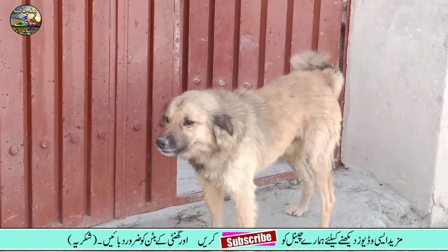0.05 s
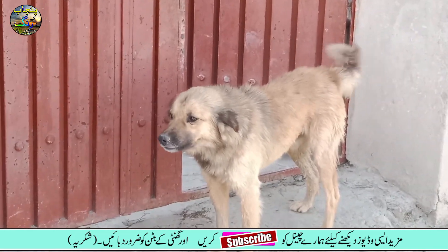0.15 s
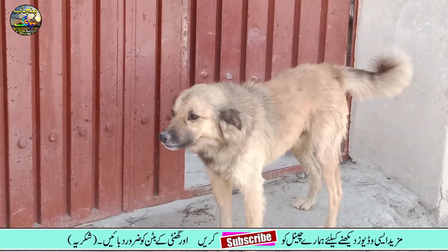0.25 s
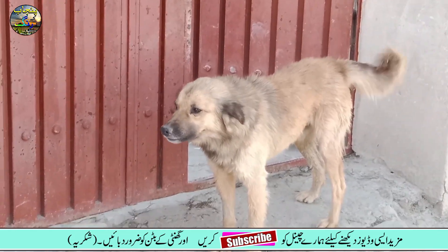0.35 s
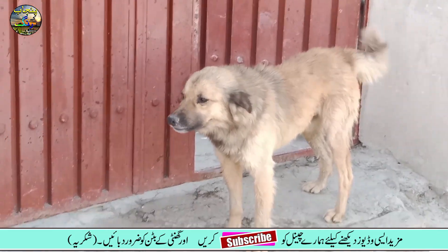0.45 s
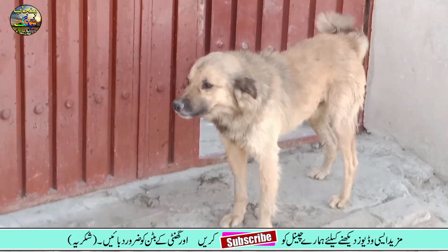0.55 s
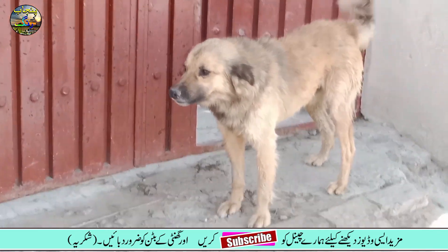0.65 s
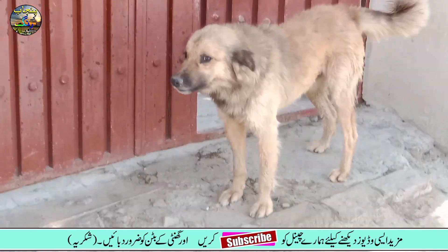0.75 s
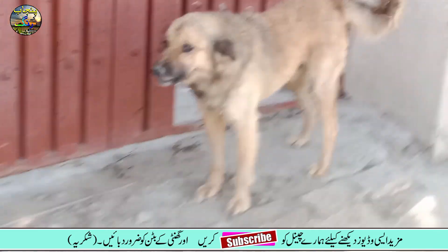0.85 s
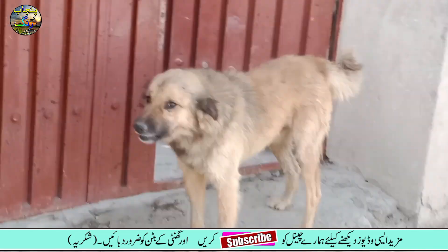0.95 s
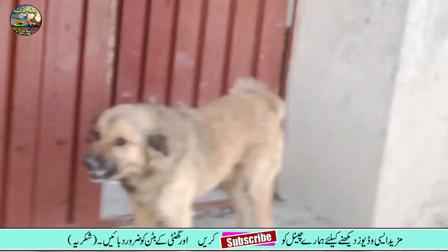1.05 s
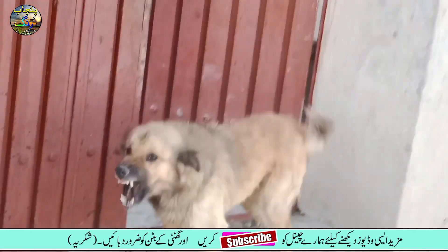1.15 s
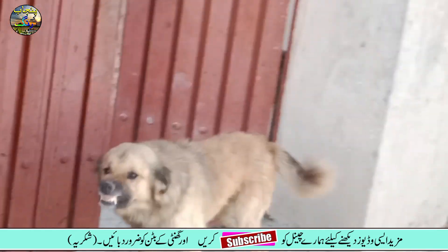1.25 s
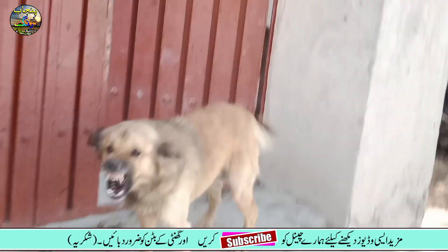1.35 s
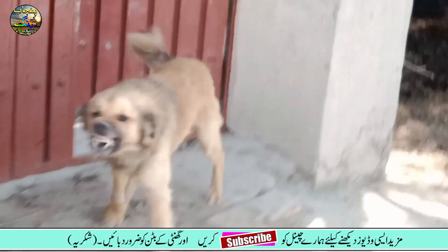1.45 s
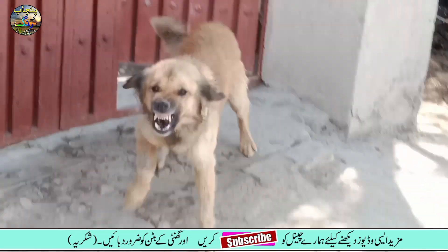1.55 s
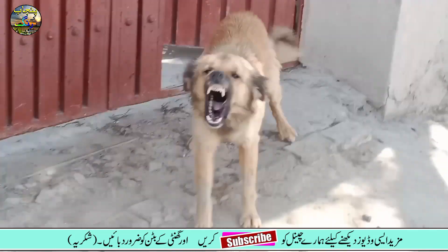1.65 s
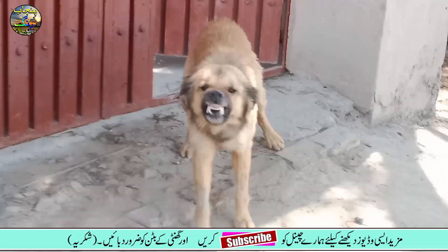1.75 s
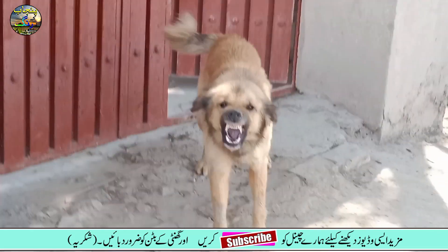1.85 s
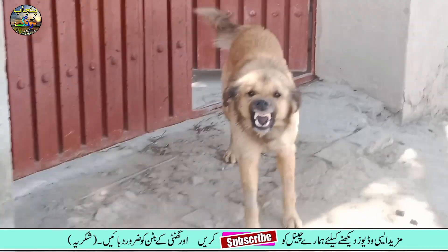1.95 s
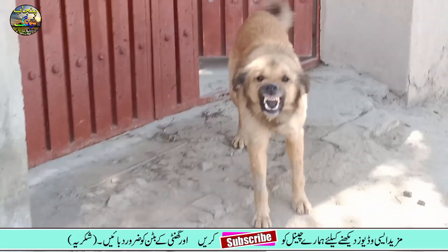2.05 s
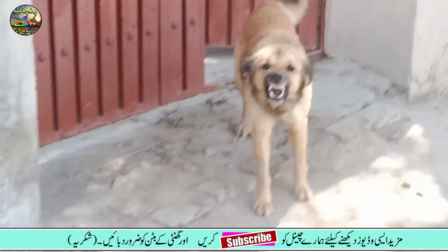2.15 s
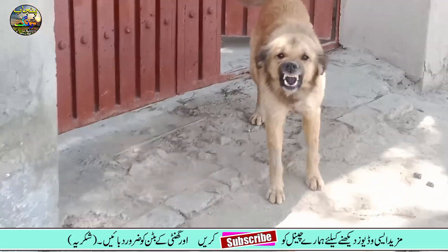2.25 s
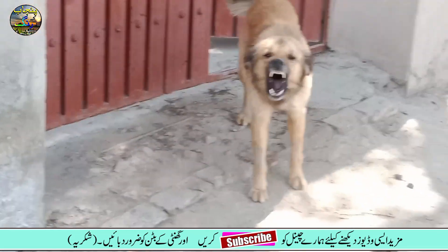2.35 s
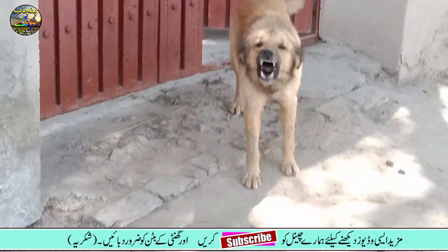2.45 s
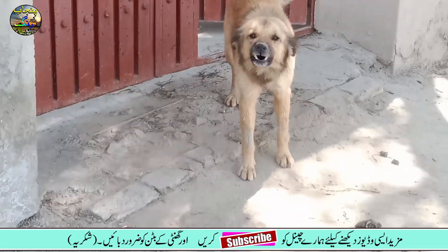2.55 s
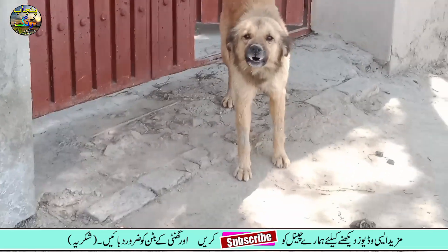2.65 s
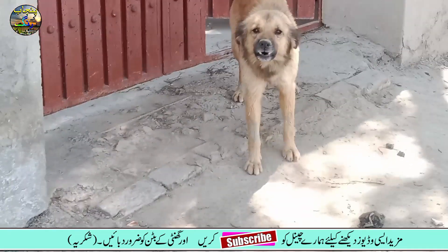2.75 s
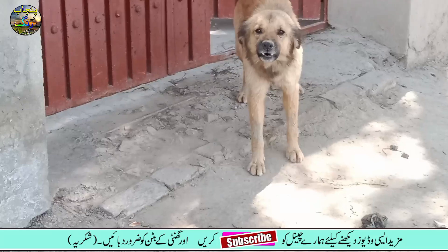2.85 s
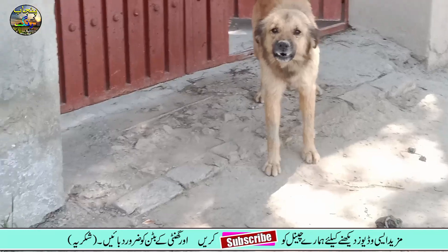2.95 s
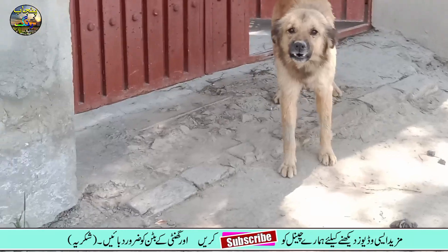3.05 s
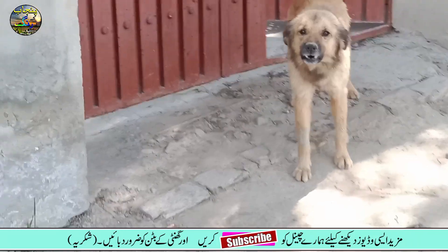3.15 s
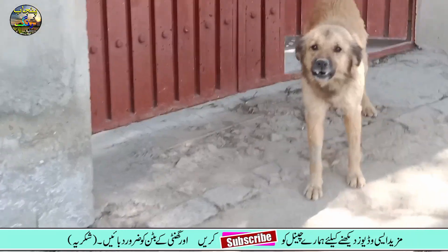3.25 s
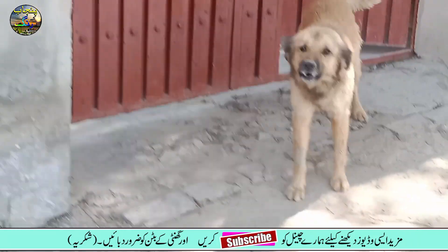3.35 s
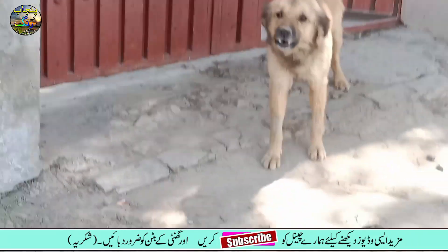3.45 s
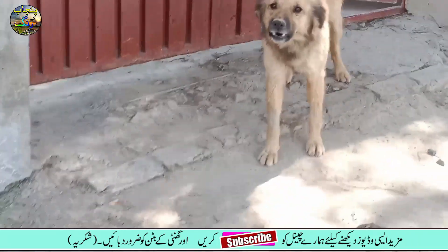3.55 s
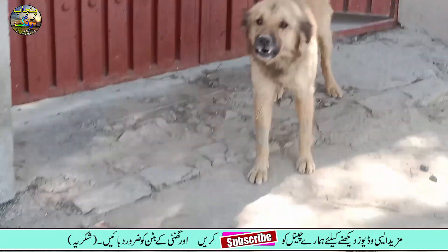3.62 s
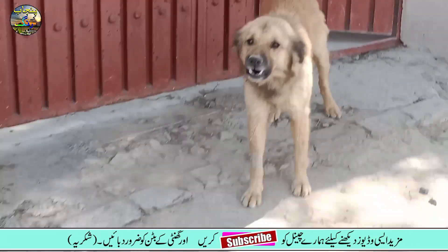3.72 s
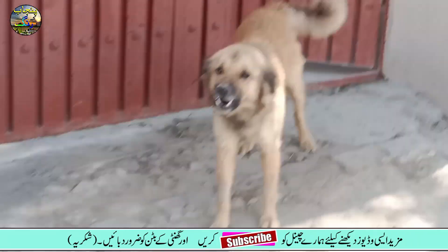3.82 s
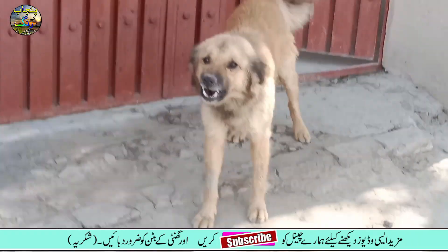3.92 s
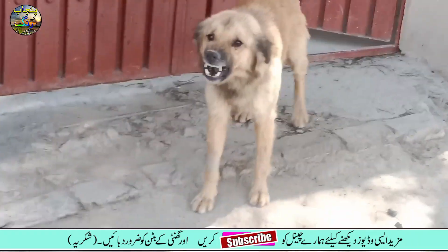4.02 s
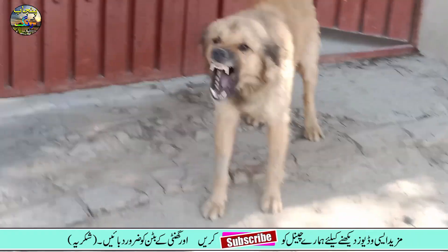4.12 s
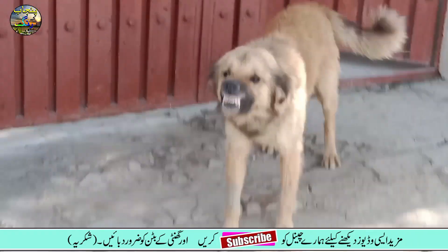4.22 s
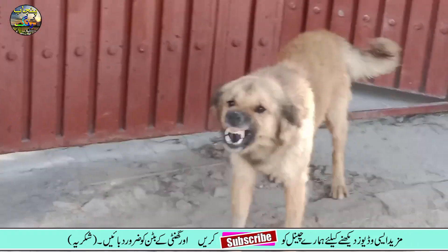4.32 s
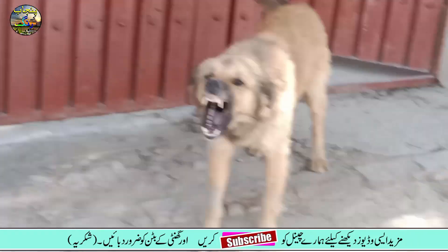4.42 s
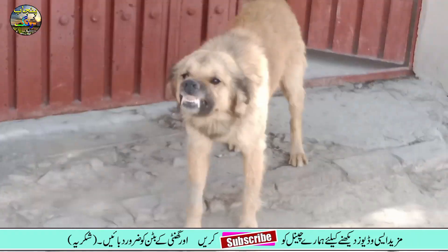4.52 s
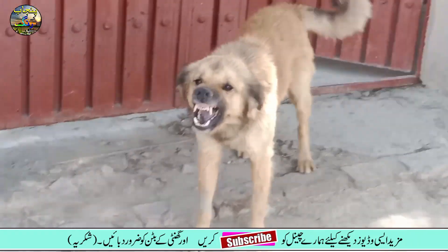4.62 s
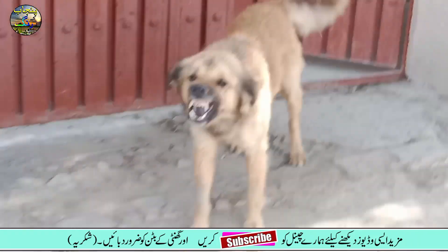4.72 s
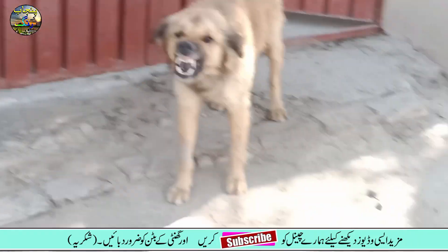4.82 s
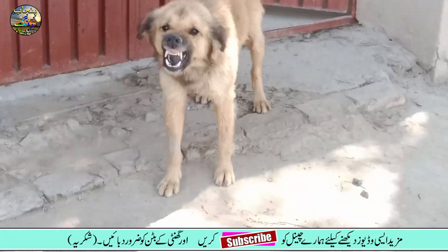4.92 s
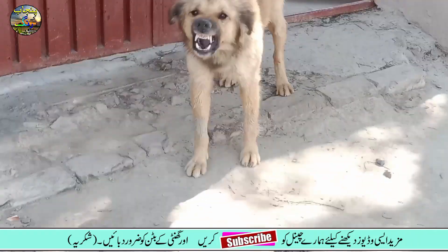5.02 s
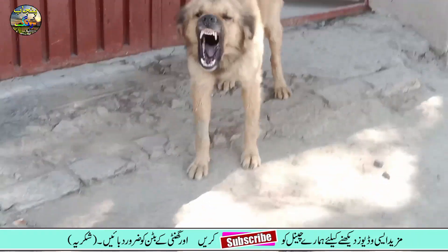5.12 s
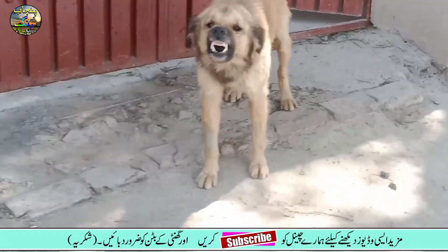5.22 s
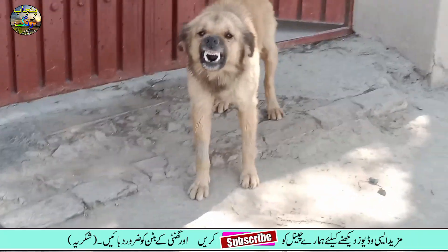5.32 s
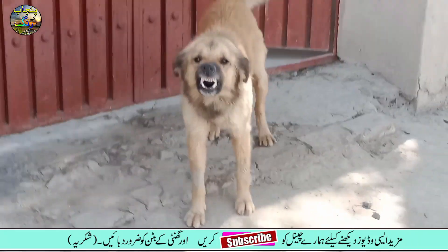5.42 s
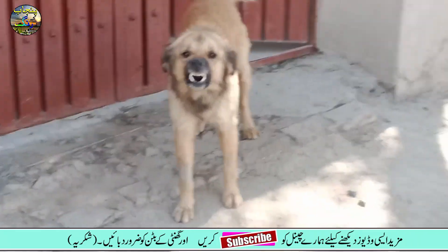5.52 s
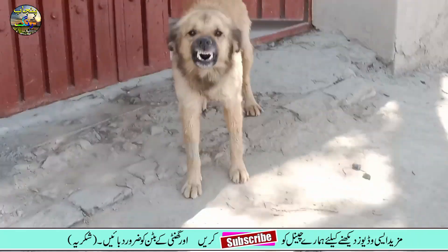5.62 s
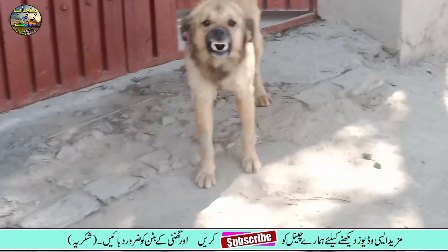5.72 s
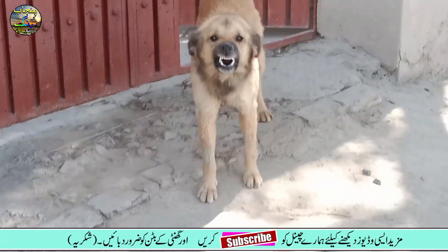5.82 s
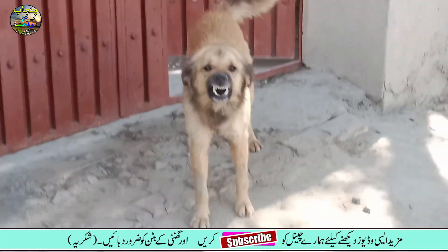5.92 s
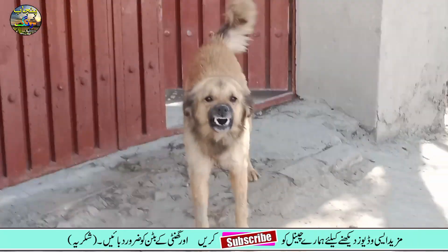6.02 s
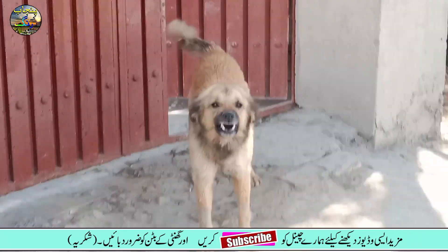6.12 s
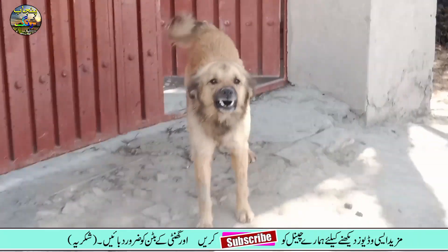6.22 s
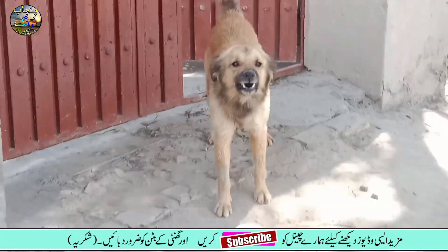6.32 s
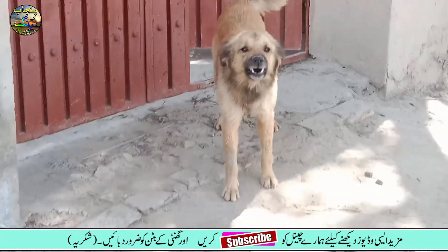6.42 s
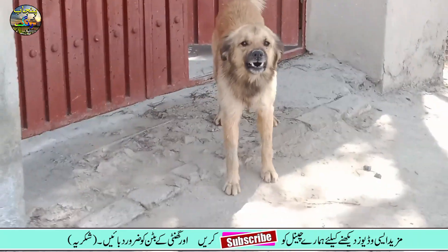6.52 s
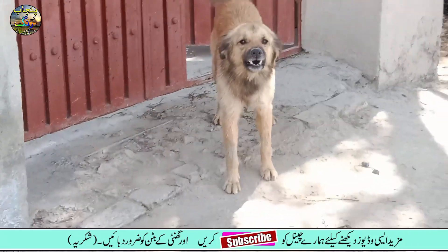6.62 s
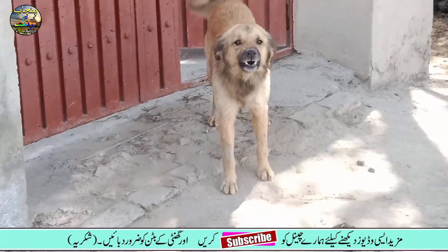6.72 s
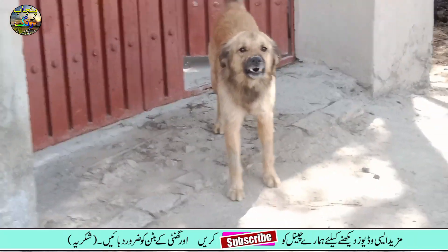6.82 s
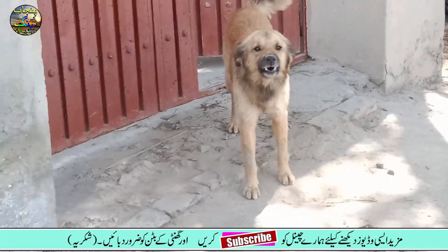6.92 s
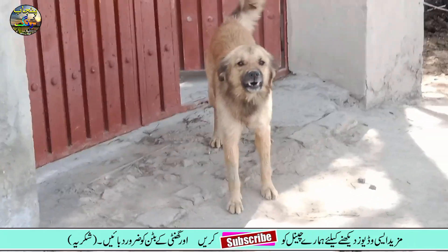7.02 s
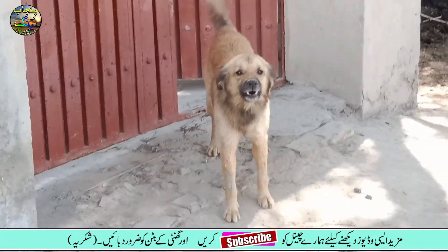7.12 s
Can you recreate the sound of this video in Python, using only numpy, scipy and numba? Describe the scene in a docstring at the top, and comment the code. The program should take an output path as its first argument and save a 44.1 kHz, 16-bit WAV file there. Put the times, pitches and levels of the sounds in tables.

```python
"""A large dog in a yard between a steel gate and a concrete wall, close to a phone: a faint growl opens, then
three barks, a snarl, a bark, a long growl, two barks, a snarl, a last bark and a growl that dies down.
Each bark is a pitched tone mixed with chopped noise: it shoots up as a hoarse roar, clears, and sinks back.
Growls are slow pulses ringing the throat and mouth; snarls are rattling air dragged in through bared teeth.
Between them grit crunches underfoot as shaped noise, and echoes follow every sound over a faint air noise."""
import sys
import numpy as np
from scipy import signal
from scipy.fft import rfft, irfft
from scipy.io import wavfile
from scipy.ndimage import uniform_filter1d
from numba import njit

SR = 44100
rng = np.random.default_rng(int(sys.argv[2]) if len(sys.argv) > 2 else 0)


def store_pcm(level_fs):
    """Save levels as 16-bit WAV."""
    pcm = np.round(np.clip(level_fs, -1, 1) * 32767).astype(np.int16)
    wavfile.write(sys.argv[1], SR, np.atleast_2d(pcm).T)


N = 316197
T = np.arange(N) / SR


def bark():
    """Hard-driven vocal folds swing between chaos and a clean tone, heard through the wide open mouth."""
    # low part of the voice: (frequency [Hz], relative strength [dB])
    body_points = [(80, -44), (160, -24), (250, -14), (330, -24), (450, -10.5), (560, 4.5), (640, 6),
                   (760, -1.5), (900, -23), (1300, -45.5)]
    # hoarse upper part of the voice: (frequency [Hz], relative strength [dB])
    rasp_points = [(1500, -25), (2300, 8.5), (2750, 2), (3300, -8), (3900, -4.5), (4700, -6), (5600, -2.5),
                   (6600, -10.5), (8000, -11), (9300, -30.5), (12000, -25.5), (15000, -38)]
    db, hz, rough, second_hz, second_db, third_hz, third_db, rasp_db = voice_controls()
    rough = np.clip(rough, 0, 1)
    shaky_hz = hz * (1 + 0.0906 * rough * wander(220))
    phase = 2 * np.pi * np.cumsum(shaky_hz) / SR
    tone = unit(sum(np.sin(k * phase) / k ** 1.4 for k in np.arange(1, 5)))
    # roughness weakens the tone and makes it flutter
    tone = (1 - rough) * tone * (1 + 1.15 * rough * wander(170))

    # the lips and false folds flap unevenly and chop the airflow
    _, puffs = flaps(np.full(N, 150.), jitter=0.47, scatter_db=2.5, open_share=0.58)
    chaos = unit((puffs + 0.91) * noise())
    source = tone + (1.7 * rough ** 0.98 + 0.019) * chaos

    # the lowest resonance climbs with the pitch as the jaw drops
    lowest = formant(source, np.clip(hz, 480, 670), width_hz=120)
    body = colour(source + 0.55 * tone, body_points) + 0.41 * lowest
    second = formant(source, second_hz, width_hz=305)
    third = formant(source, third_hz, width_hz=400)
    third = third + 0.24 * formant(source, 1.243 * third_hz, width_hz=700)
    rasp = upper_throat(source + 0.1 * chaos, second_hz / 2, restless=0.024)
    rasp = upper_throat(rasp, third_hz / 2, restless=0.084)
    rasp = colour(rasp, rasp_points)

    # as the jaw closes, side pockets of the throat swallow the band near 4 kHz;
    # a lower level stands for a more closed jaw
    closed = np.interp(db, [-23, -14], [1, .1])
    for pocket_hz in (3700., 3950., 4250., 4600.):
        rasp = rasp - closed * svf(rasp, np.full(N, pocket_hz), 1200.0)

    parts = [(body, .2), (second, second_db - .3), (third, third_db + 0.42), (rasp, rasp_db + 0.15)]
    voice = sum(even(x, window_s=0.021) * undb(db + share_db) for x, share_db in parts)
    # the wide open mouth radiates almost nothing below 50 Hz
    return signal.sosfilt(signal.butter(2, 50, "high", fs=SR, output="sos"), voice)


def voice_controls():
    """One throat makes all barks and grunts: the strongest push of the moment takes it over."""
    # barks: (start of hold [s], attack [s], hold [s], fall [s], top pitch [Hz], base level [dB],
    # swell over the hold [dB], share of the hold before it clears [0-1], roughness once cleared [0-1],
    # second resonance [Hz], its base share [dB], third resonance [Hz], its base share [dB],
    # base share of the rasp [dB])
    bark_rows = [(1.243, .048, 0.088, 0.046, 692.5, -12.5, 0, 0.82, .5, 910, -3, 1666, -10, -19),
                 (1.469, .048, 0.092, 0.03, 659.3, -10.5, 0, .66, 0.15, 1082, -5, 1650, -11.5, -19.5),
                 (1.735, 0.051, 0.079, .042, 641, -12.5, 2.5, 0.74, 0.08, 1078, -4, 1740, -10, -19.5),
                 (2.42, .034, .086, .016, 654, -12.5, 3.5, 0.66, 0.1, 1053, -5.5, 1845, -11.5, -17.5),
                 (4.185, .058, .108, .036, 680.4, -12, 3, .42, 0.35, 1039, -8.5, 1519, -6, -19),
                 (4.489, .052, 0.099, 0.025, 648.4, -11, -0.5, 0.5, 0.12, 1086, -5, 1605, -9.5, -20),
                 (5.146, 0.035, .088, .017, 656.3, -12.5, 3.5, 0.67, 0.26, 989, -9.5, 1540, -8.5, -18.5)]
    # grunts, weak last pushes between and after barks: (middle [s], length [s], pitch at the middle [Hz],
    # level at the middle [dB], share of the upper resonances [dB])
    grunt_rows = [(1.405, .05, 266.1, -34.5, 0), (1.613, 0.053, 286.9, -26.5, -5),
                  (1.703, .055, 214.9, -23, -7.5), (2.566, 0.0454, 269.2, -30, 0.5),
                  (2.642, .058, 210, -33, -1.5), (4.63, .035, 311, -34, -4), (5.274, .065, 312, -26, -2),
                  (5.362, 0.12, 207.5, -34, -2)]
    # a curve point every 32 samples is enough
    t = T[::32]
    pushes = [bark_course(t, *row) for row in bark_rows]
    pushes += [grunt_course(t, *row) for row in grunt_rows]
    pushes = np.array([np.broadcast_arrays(*push) for push in pushes])
    levels = pushes[:, :1]
    # the fourth power lets the strongest push win clearly
    lead = undb(levels - levels.max(axis=0)) ** 4
    blended = (lead * pushes).sum(axis=0) / lead.sum(axis=0)
    return [np.interp(T, t, curve) for curve in blended]


# roughness of a bark's tail and of the grunts (0 = clean, 1 = chaos)
TAIL_ROUGH = 0.434


def bark_course(t, start, attack_s, hold_s, fall_s, top_hz, db, swell_db, clears, clear_rough,
                second_hz, second_db, third_hz, third_db, rasp_db):
    """One bark: level, pitch, roughness, the two upper resonances with their shares, and the rasp."""
    # pitch leaps from a low note and arches over the hold
    low_hz, leap_s, arch, crest_share = 225.4, 0.014, .38, .69
    # it starts as a roar and clears part way through the hold
    roar_rough, clearing_share = 0.866, 0.13
    # the level climbs through the attack, drops when the push ends and then fades
    attack_db, drop_db, drop_share, fade_db_per_s = 40, 20, 0.74, 153
    # pitch and level let go gently at first, then quickly (exponent of the fall)
    fall_roundness = 1.4
    # the jaw gapes mid-bark, moving power from the lowest resonance to the parts above
    gape_dip_db, gape_second_db, gape_third_db, gape_rasp_db = 2, 4.5, 6, 1
    # a cleared voice is duller, a tail brighter
    clear_dull_db, tail_bright_db = 2, 6

    early = np.maximum(start - t, 0)
    late = np.maximum(t - start - hold_s, 0)
    along = np.clip((t - start) / hold_s, 0, 1)
    gape = np.sin(np.pi * along) ** 2
    spent = 1 - np.exp(-(late / (drop_share * fall_s)) ** fall_roundness)
    cleared = (1 + np.tanh((along - clears) / clearing_share)) / 2

    level = db + swell_db * (along - .5) - gape_dip_db * gape
    level = level - attack_db * early / attack_s - drop_db * spent - fade_db_per_s * late
    arch_hz = top_hz * (1 - arch * (along - crest_share) ** 2)
    hz = low_hz + (arch_hz - low_hz) * np.exp(-early / leap_s - (late / fall_s) ** fall_roundness)
    rough = roar_rough + (clear_rough - roar_rough) * cleared
    rough = rough + (TAIL_ROUGH - clear_rough) * spent ** 2
    bright_db = tail_bright_db * spent - clear_dull_db * cleared
    # the upper two resonances glide upwards over the hold
    glide = 1 + 0.052 * (along - .5)
    return (level, hz, rough,
            second_hz * glide, second_db + gape_second_db * gape + bright_db,
            third_hz * glide, third_db + gape_third_db * gape + bright_db,
            rasp_db + gape_rasp_db * gape + bright_db)


def grunt_course(t, middle, length_s, hz, db, upper_db):
    """One grunt: the same controls for a short, hoarse swell on a sagging pitch."""
    sag_per_s, edge_db = 3, 9.5
    second_hz, third_hz, third_db, rasp_db = 1120, 1647, -1.5, -13.5
    since = np.clip(t - middle, -length_s, length_s)
    level = db - edge_db * (2 * (t - middle) / length_s) ** 2
    return (level, hz * np.exp(-sag_per_s * since), TAIL_ROUGH,
            second_hz, upper_db, third_hz, upper_db + third_db, upper_db + rasp_db)


def growl():
    """Slow fold pulses ring chest, throat and mouth; air hisses over the teeth once a cycle."""
    # colours of the chest, the teeth and the hiss: (frequency [Hz], relative strength [dB])
    chest_points = [(35, -29.5), (65, -1.5), (92, 6), (135, 4), (175, -2.5), (250, 5.5), (330, -37),
                    (500, -51.5)]
    teeth_points = [(900, -58.5), (1400, 3), (1650, -2), (1950, 1.5), (2400, -8), (2850, -12.5),
                    (3300, -19.5), (3900, -57), (5000, -52.5)]
    hiss_points = [(3500, -45), (4700, -17.5), (5500, 5.5), (6600, -0.5), (8100, -10.5), (9200, -29),
                   (15000, -43.5)]
    gate, hz, throat_hz, mouth_hz, teeth_hz, db, chest_db, mouth_db, teeth_db, hiss_db = growl_controls()
    pulses, puffs = flaps(hz, jitter=.06, scatter_db=3.5, open_share=0.46)
    pulses = unit(pulses)
    air = unit((puffs + 0.23) * noise())

    # mouth and nose are two pipes of unlike length, so their high resonances lie unevenly
    bright = upper_throat(.25 * pulses + air, 1.25 * throat_hz, restless=0.045)
    bright = upper_throat(bright, teeth_hz / 2, restless=0.086)

    chest = colour(pulses + 0.66 * air, chest_points)
    throat = formant(pulses + 0.39 * air, throat_hz, width_hz=119)
    throat = throat + 0.092 * formant(pulses + air, 0.53 * throat_hz, width_hz=430)
    mouth = formant(pulses + 0.8 * air, mouth_hz, width_hz=130)
    teeth_source = colour(.5 * pulses + air, [(2800, 1.0), (3900, -13.5)])
    teeth = colour(bright, teeth_points) + 2.8 * formant(teeth_source, teeth_hz, width_hz=370)
    hiss = colour(bright, hiss_points)

    parts = [(chest, chest_db - .2), (throat, .3), (mouth, mouth_db),
             (teeth, teeth_db - .2), (hiss, hiss_db - .2)]
    voice = 0
    for x, share_db in parts:
        # each part wavers in strength on its own
        waver_db = 1.58 * wander(11)
        voice = voice + even(x, window_s=0.011) * undb(db + share_db + waver_db)
    return gate * voice


def growl_controls():
    """Gate and controls of the growls; the resonances and the hiss follow pitch and lips."""
    # growls in phrases; a long growl may run on through two phrases: (time [s], pitch [Hz],
    # base level [dB], mouth resonance [Hz], brightness from bared teeth [dB])
    curves = [
        [(0.0, 81.3, -71.5, 790, 5), (0.036, 82.38, -73.5, 850, 13), (0.22, 79.22, -78, 810, 19.5)],
        [(0.97, 80.1, -51.5, 780, -16), (1.068, 79.8, -52, 785, -11), (1.19, 87.9, -49.5, 900, -18)],
        [(2.69, 101.8, -40, 1010, -2.5), (2.79, 101, -39, 1060, -12.5), (2.85, 91.44, -42, 1056, -15.5),
         (3.072, 84.66, -54.5, 1080, -6), (3.32, 88.52, -55, 1020, -8.5)],
        [(3.33, 82.3, -55.5, 1080, -6.5), (3.404, 86.2, -55, 1168, -3.5), (3.778, 91.75, -55.5, 1164, -13),
         (3.954, 106, -40, 1160, -8), (4.062, 102.7, -41.5, 1210, -8.5), (4.14, 113.6, -36.5, 1270, -10.5)],
        [(4.37, 116, -43.5, 1130, -7), (4.408, 105.1, -44.5, 1068, 5), (4.45, 107.7, -37.5, 1084, 5.5)],
        [(5.42, 95.8, -38.5, 1120, -3), (5.57, 96.37, -40, 1130, -7), (5.608, 92.35, -41, 1167, -10.5),
         (6.04, 93.2, -43.5, 1155, -6), (6.05, 91.33, -44, 1180, -6.5), (6.314, 92.5, -46.5, 1000, -13.5),
         (6.422, 93.25, -46.5, 1060, 0.5), (6.46, 88.25, -46.5, 1012, -1.5), (6.65, 90.7, -54, 1050, 1)],
        [(6.66, 88, -56, 1056, -1.5), (6.774, 91.8, -48, 1020, -6), (6.846, 86.2, -57.5, 1055, -7),
         (7.16, 84, -59.5, 1120, -3)],
    ]
    # how the dog holds each phrase: (share of the chest [dB], of the mouth [dB], base share of the hiss [dB])
    postures = [(24, 8, -4.5), (3.5, -4, -13.5), (-3.5, -1.5, -19.5), (-2.5, -8.5, -12), (-3, 5, -9),
                (-8, -5, -17.5), (-6, -5.5, -16)]
    phrases = [[(*point, *posture) for point in curve] for curve, posture in zip(curves, postures)]
    gate, hz, db, mouth_hz, teeth_db, chest_db, mouth_db, hiss_db = controls(phrases, fade_s=0.033)
    # the throat resonance is 474.6 Hz at a pitch of 91.2 Hz and rises with the pitch
    throat_hz = 474.6 * (hz / 91.2) ** 0.53
    # drawing the lips back raises the teeth resonance, up to 1764 Hz, and the hiss
    teeth_hz = 1764 + 26.5 * np.minimum(teeth_db, 0)
    hiss_db = hiss_db + 0.35 * teeth_db
    return gate, hz, throat_hz, mouth_hz, teeth_hz, db, chest_db, mouth_db, teeth_db, hiss_db


def snarl():
    """Air dragged inwards rattles the soft palate and whistles between the teeth."""
    # pulls of air: (time of the peak [s], length [s], base level [dB], whistle relative to the pull [dB])
    pulls = [(1.935, 0.18, -25, -5.5), (4.71, 0.22, -26, -3.5)]
    # the soft palate slaps during a snarl: (time [s], base level [dB])
    slaps = [(1.948, -56.5), (1.983, -31), (4.69, -27), (4.749, -26), (4.792, -28), (4.842, -32.5)]
    # gaps between the teeth: (frequency [Hz], width of each filter pass [Hz], relative strength [dB])
    tooth_gaps = [(3480, 240, 1.5), (4070, 260, 6.5), (4480, 300, -6)]
    # colours of the throat and the whistle: (frequency [Hz], relative strength [dB])
    throat_points = [(35, -27.5), (60, -32.5), (96, -8.5), (168, -20), (241, -10), (369, -31.5), (613, 3),
                     (699, -7.5), (771, 1.5), (879, -17.5), (1240, -12), (1370, -15.5), (1870, -10),
                     (2060, -16.5), (3000, -24), (3900, -59.5), (6600, -120)]
    whistle_points = [(2200, -20.5), (3000, -3), (3900, -12), (5150, -18.5), (5700, -15.5), (7000, -17.5),
                      (8600, -26.5), (9500, -35), (15000, -34)]
    attack_db_per_s, fade_db_per_s, release_db_per_s = 412, 86.5, 400.5

    pull, whistle_pull = 0, 0
    for start, length_s, db, whistle_db in pulls:
        since = T - start
        db = db + np.minimum(attack_db_per_s * since, -fade_db_per_s * since)
        # past its length the fade steepens
        db = db - release_db_per_s * np.maximum(since - length_s, 0)
        pull = pull + undb(db)
        whistle_pull = whistle_pull + undb(db + whistle_db)

    _, puffs = flaps(np.full(N, 60.), jitter=.3, scatter_db=3, open_share=.35)
    air = (puffs + 0.4) * noise()
    throat = even(colour(air, throat_points), window_s=0.11) * pull * undb(-2.0)
    whistle = sum(undb(gap_db) * formant(air, np.full(N, float(hz)), width) for hz, width, gap_db in tooth_gaps)
    teeth = even(colour(air, whistle_points) + 0.7 * whistle, window_s=0.0097)
    teeth = teeth * whistle_pull * undb(-6.0)
    slap_noise = strikes(slaps, decay_s=0.006) * noise()
    palate = formant(slap_noise, np.full(N, 720.), width_hz=180) * undb(26)
    return throat + teeth + palate


def steps():
    """Feet slide over loose grains; now and then one snaps."""
    # steps on grit: (time [s], length [s], level of the push [dB])
    scuffs = [(0.949, 0.028, -37), (0.997, 0.057, -46), (4.023, 0.021, -53), (5.405, 0.041, -47.5),
              (6.679, 0.06, -54), (6.721, 0.084, -59), (6.772, 0.04, -45)]
    # grit snapping underfoot: (time [s], starting level [dB])
    ticks = [(.951, -48.5), (5.713, -56), (6.003, -50), (6.769, -39)]
    # colour of the grit: (frequency [Hz], relative strength [dB])
    grit_points = [(300, -10.5), (900, -11.5), (1600, 2.5), (3000, 4.5), (4500, -7), (6500, -4.5),
                   (9000, -25.5), (15000, -26)]
    push = 0
    for s, length, db in scuffs:
        times = [s - .002, s + 0.0035, s + 0.66 * length, s + length, s + length + 0.039]
        push = push + undb(db) * np.interp(T, times, [0.00061, .8, 1, 0.21, 0.0014])
    grains = unit(colour(noise() * undb(4 * wander(400)), grit_points))
    snap_noise = unit(formant(noise(), np.full(N, 5500.), width_hz=14000))
    return push * grains + strikes(ticks, decay_s=.0009) * snap_noise


def yard(x, wet_db, t60_s, slap_db):
    """Ground, gate and wall answer at once; a thin tail lingers between them."""
    # colour of the echoes: (frequency [Hz], relative strength [dB])
    echo_points = [(60, -30.5), (250, -16.5), (450, -18), (640, 8), (850, -9.5), (2000, 7.5), (3000, 1.5),
                   (3800, -15.5), (4700, -16), (5600, -7), (7000, -5), (14000, -24.5)]
    # the tail sinks by 60 dB in t60_s
    tail = noise() * np.exp(-np.log(1000) * T / t60_s) * np.clip(T / 0.012, 0, 1)
    echoes = undb(wet_db) * tail / np.sqrt(np.sum(tail ** 2))
    for lag_s, share in [(.0034, 0.75), (.0115, 1), (.019, .5)]:
        echoes[int(lag_s * SR)] += share * undb(slap_db)
    return x + colour(signal.fftconvolve(x, echoes)[:N], echo_points)


def still_air():
    """Nearly still air: a very faint, steady coloured noise."""
    # colour of the air: (frequency [Hz], relative strength [dB])
    air_points = [(30, 6), (150, 1.5), (400, -13), (2500, -37), (9000, -26.5), (15000, -13.5)]
    return undb(-90.5) * unit(colour(noise(), air_points))


def flaps(hz, jitter, scatter_db, open_share):
    """Slack tissue slapping shut: a pulse per cycle, and the puff of air that follows it."""
    turns = np.cumsum(hz * np.exp(jitter * wander(70))) / SR
    cycle = turns.astype(int)
    size = undb(scatter_db * rng.standard_normal(cycle[-1] + 1))[cycle]
    pulses = np.diff(cycle, prepend=0) * size
    puffs = np.exp(-(turns % 1) / open_share) * size
    return pulses, puffs


def upper_throat(x, spacing_hz, restless):
    """The high resonances drift as tongue and lips move."""
    drifting_hz = spacing_hz * (1 + restless * wander(4))
    return tube(x, np.clip(drifting_hz, 200, 2000), .45)


@njit
def tube(x, spacing_hz, feedback):
    """Sound bouncing along the throat: a row of resonances that slide with its length."""
    y = x.copy()
    for i in range(400, len(x)):
        # read between two samples, one round trip ago
        place = i - SR / spacing_hz[i]
        j = int(place)
        y[i] += feedback * (y[j] + (place - j) * (y[j + 1] - y[j]))
    return y


def formant(x, hz, width_hz):
    """A resonance with steep skirts: the same band-pass twice."""
    once = svf(x, hz, float(width_hz))
    return svf(once, hz, float(width_hz))


@njit
def svf(x, hz, width):
    """Band-pass with a moving centre, gain 1 there."""
    y, band, low = np.empty(len(x)), 0., 0.
    for i in range(len(x)):
        g, k = np.tan(np.pi * hz[i] / SR), width / hz[i]
        v = (band + g * (x[i] - low)) / (1 + g * (g + k))
        band = 2 * v - band
        low = low + 2 * g * v
        y[i] = k * v
    return y


def strikes(table, decay_s):
    """Sudden pushes that die away."""
    return sum(undb(db) * (T >= s) * np.exp(-np.abs(T - s) / decay_s) for s, db in table)


def controls(tables, fade_s):
    """The columns of several phrases as curves, after a gate that is open while a phrase lasts."""
    s, *columns = np.vstack(tables).T
    gates = []
    for phrase in tables:
        first, last = phrase[0][0], phrase[-1][0]
        gates.append(np.interp(T, [first - fade_s, first, last, last + fade_s], [0, 1, 1, 0]))
    return [np.max(gates, axis=0)] + [np.interp(T, s, c) for c in columns]


def colour(x, points):
    """Filter through (frequency [Hz], gain [dB]) points that never sounds ahead of its input."""
    hz, db = np.transpose(points)
    size = 4096
    bin_hz = np.arange(size // 2 + 1) * SR / size
    log_gain = np.log(undb(np.interp(np.log(bin_hz + 1), np.log(hz), db)))
    # folding the cepstrum forwards gives the filter its minimum delay
    cepstrum = irfft(log_gain)
    cepstrum[1:size // 2] *= 2
    cepstrum[size // 2 + 1:] = 0
    return signal.fftconvolve(x, irfft(np.exp(rfft(cepstrum))))[:N]


def even(x, window_s):
    """Unit power over every short window; faster grain stays."""
    size = max(int(window_s * SR), 8)
    power = uniform_filter1d(uniform_filter1d(x * x, size), size)
    return x / np.sqrt(np.abs(power) + 1e-12)


def wander(rate_hz):
    """Smooth chance of unit spread: noise kept below the given rate."""
    return unit(signal.sosfilt(signal.butter(2, rate_hz, fs=SR, output="sos"), noise()))


def unit(x):
    """Scale to unit power."""
    return x / np.sqrt(np.mean(x ** 2))


def noise():
    """White noise of unit power."""
    return rng.standard_normal(N)


def undb(db):
    """Decibels to gain."""
    return 10 ** (np.asarray(db) / 20)


def scene():
    """The dog and its steps in the yard, over nearly still air."""
    dog = bark() + growl() + snarl() + steps()
    echoed = yard(dog, wet_db=-17.5, t60_s=0.41, slap_db=-19.0)
    return (echoed + still_air())[None]


def record(dry):
    """The phone rounds the loudest peaks and cuts the top."""
    rounded = dry / (1 + (dry / .92) ** 6) ** (1 / 6)
    top_hz = 15600
    return signal.sosfilt(signal.ellip(10, .2, 80, top_hz, fs=SR, output="sos"), rounded)


dry = scene()
out = record(dry)
store_pcm(out)
```